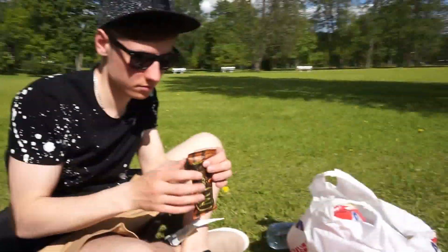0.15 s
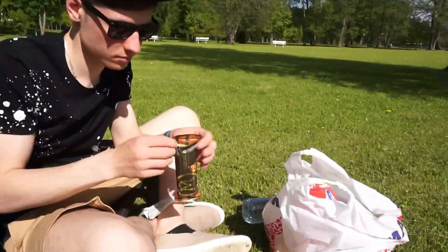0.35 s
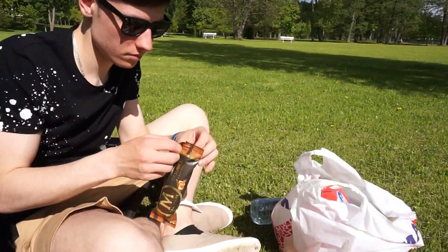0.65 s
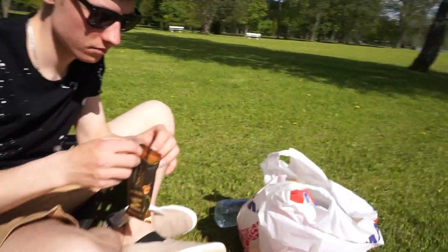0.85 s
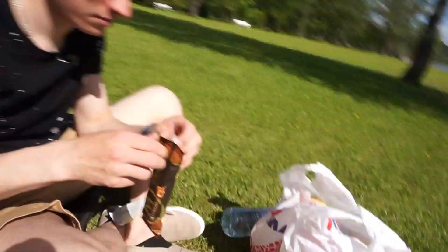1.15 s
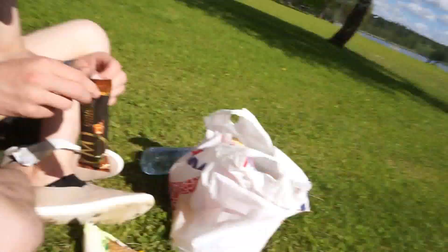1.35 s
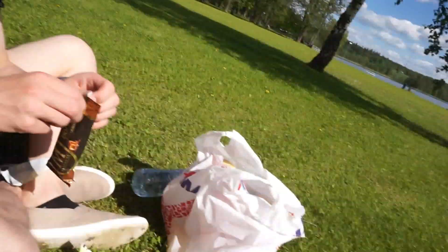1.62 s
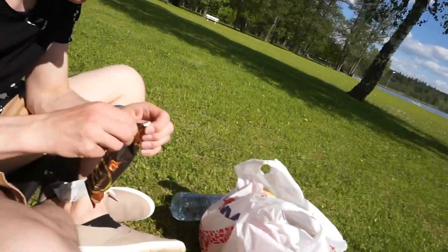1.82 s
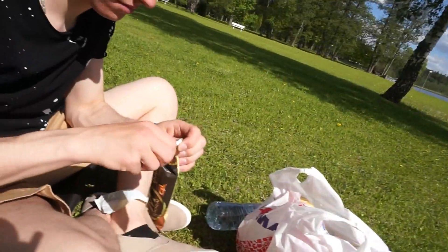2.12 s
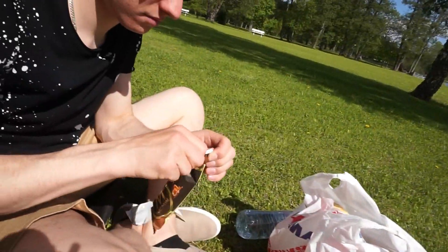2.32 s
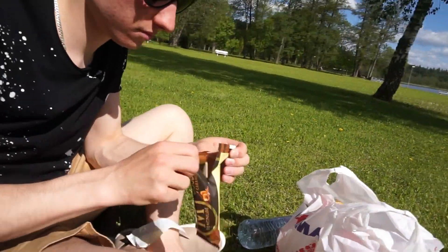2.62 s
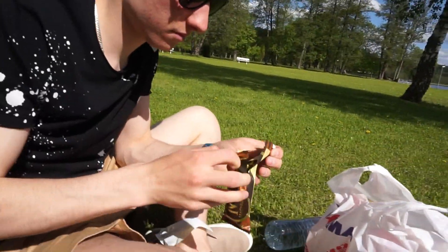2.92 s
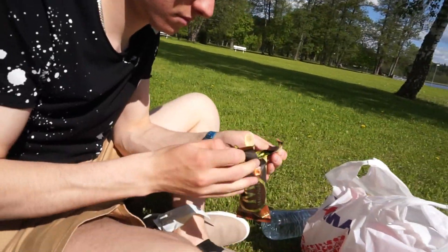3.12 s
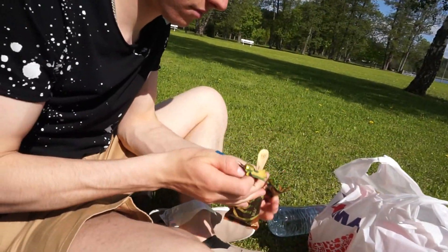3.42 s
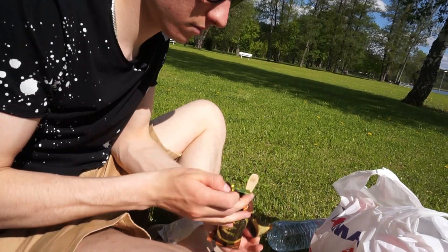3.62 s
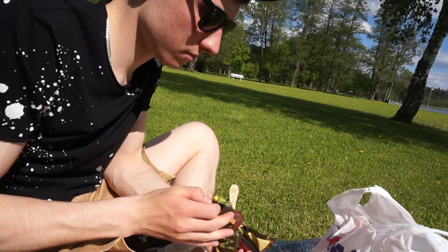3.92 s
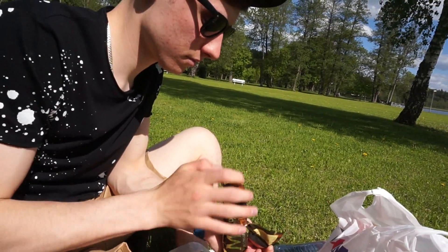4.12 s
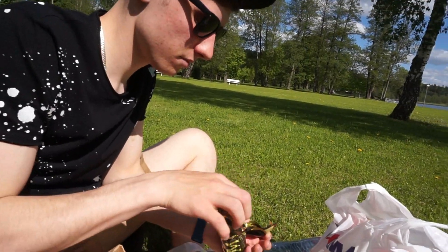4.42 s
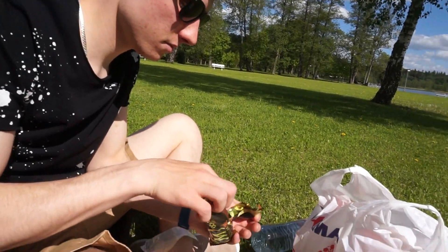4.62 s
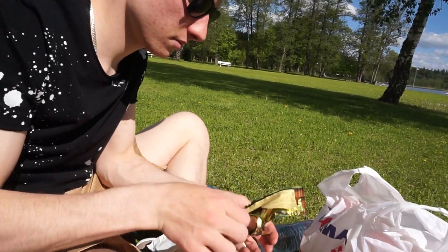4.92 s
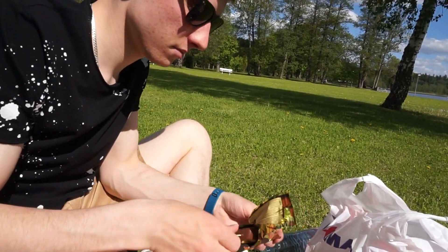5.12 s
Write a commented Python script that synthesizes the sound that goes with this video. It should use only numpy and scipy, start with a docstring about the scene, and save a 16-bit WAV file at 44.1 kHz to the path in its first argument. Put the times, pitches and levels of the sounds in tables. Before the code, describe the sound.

Outdoors on a quiet lawn, a thin, crisp ice cream wrapper is opened by hand close to a stereo microphone, slightly left of centre, dry with no room echo. From 0 to 0.5 s come strong, dense crackles, then looser rustles and snaps. Around 1.05 to 1.1 s a firm cluster of creases lands with a dull, hollow pop of trapped air. Lighter, brighter crinkling follows, with a sharp snap at 1.9 s. At about 2.35 to 2.45 s the seal rips: the loudest, brightest burst, with another short airy thump. Sparse ticks follow. From 3.3 s the seam peels in a tiny fast buzz that slows into separate ringing clicks until 3.65 s, then a crisp rustle to 3.8 s. Afterwards only faint, scattered crackles remain, with small flicks near 4.7 and 5.2 s. A soft, steady hush of trees lies beneath; two very faint, slightly sinking distant tones swell between 4 and 4.7 s.

```python
"""Opening an ice cream wrapper

An ice cream wrapper is opened by hand, close by on a quiet lawn. Buckling creases snap and rustle as short
bursts of resonant noise; the jolted air of the pouch pops as damped tones, and a loud stroke rips the seal.
The seam then peels in a stick-slip zip that slows into jerks, and the loose film is folded back.
Behind it lie a soft steady hush of distant trees and two faint far tones."""
import sys
import numpy as np
from scipy import signal
from scipy.fft import rfft, irfft, next_fast_len
from scipy.io import wavfile
from scipy.ndimage import uniform_filter1d

SR = 44100
rng = np.random.default_rng(int(sys.argv[2]) if len(sys.argv) > 2 else 0)


def persist_wave(psi):
    """Save psi, clipped to +-1, as 16-bit WAV."""
    counts = np.round(np.clip(psi, -1, 1) * 32767).astype(np.int16)
    wavfile.write(sys.argv[1], SR, np.atleast_2d(counts).T)


N = 231782
TIME = np.arange(N) / SR
LEAD_S = .003  # silence ahead of each buckle: room for the zero-phase filters

# light, constant working of the film:
# t/s, body level/dB, level of the lows re body/dB, level of the treble re body/dB
WORKING = [(0.0, -48, -10, -12), (0.4, -54.5, -27, -16), (0.53, -56.5, -6, -13), (0.7, -48.5, -12.5, -6.5),
           (1.12, -49, -2.5, -8), (1.36, -54, -11, -5), (1.77, -49.5, -9.5, 2), (1.95, -56.5, -4, 0),
           (2.25, -53, -8, -11), (2.47, -55, -11, 3), (2.59, -61.5, -3.5, -4.5), (3.1, -62, -17, -3),
           (3.72, -48.5, -14.5, 3), (3.835, -60, -9, -5.5), (4.25, -67, -3.5, -6), (4.75, -58, -1, -6.5),
           (5.08, -62.5, -8.5, -2.5), (5.255, -56, -3, -4.5)]


def amp(db):
    """Decibels to an amplitude ratio."""
    return 10 ** (np.asarray(db) / 20)


def evened(x):
    """Normalises to unit rms over both channels."""
    return x / np.sqrt(np.mean(x ** 2) + 1e-20)


def burst(x):
    """Normalises the energy of a short stereo sound to that of unit rms lasting 10 ms."""
    return x * np.sqrt(2 * SR * .01 / np.sum(x ** 2))


def read(points, hz):
    """Interpolates a spectrum linearly on a log-frequency axis."""
    f, value = np.transpose(points)
    return np.interp(np.log(hz + 1), np.log(f), value)


def follow(curve, s):
    """Interpolates every column of a curve linearly at time s."""
    times, *columns = np.transpose(curve)
    return [np.interp(s, times, column) for column in columns]


def add(mix, s, sound):
    """Superposes a sound on the mix from time s."""
    part = mix[:, max(round(s * SR), 0):][:, :sound.shape[1]]
    part += sound[:, :part.shape[1]]


def freqs(x):
    """Bin frequencies of the spectrum of x, in Hz."""
    return np.fft.rfftfreq(x.shape[-1], 1 / SR)


def shaped(x, gain):
    """Linear filtering: multiplies the spectrum by a response."""
    return irfft(rfft(x) * gain, x.shape[-1])


def resonance(hz, centre_hz, width_hz):
    """Response of a damped oscillator, gain 1 at its centre."""
    return 1j * hz * width_hz / (centre_hz ** 2 - hz ** 2 + 1j * hz * width_hz)


def band(hz, edge, kind, order):
    """Response of a maximally flat (Butterworth) filter."""
    return signal.sosfreqz(signal.butter(order, edge, kind, fs=SR, output="sos"), hz, fs=SR)[1]


def pair(apart, size):
    """Partial coherence: noise at two microphones, a common part and a part of opposite sign."""
    mid, side = rng.standard_normal((2, size))
    return evened(np.array([mid + apart * side, mid - apart * side]))


def snaps():
    """Snap-through buckling: the large creases, one by one."""
    out = np.zeros((2, N))
    # creases that snap: t/s, body level over 10 ms/dB, level of the lows re body/dB,
    # level of the treble re body/dB, ring f/Hz
    large_creases = [(0.0157, -29.5, -13, -6, 2030), (0.035, -34.5, -32, -4, 2680),
                     (0.0471, -32, -22, -5.5, 3390), (0.1092, -38.5, -21, -2.5, 1850),
                     (0.122, -39.5, -19, -6, 3100), (0.1414, -40.5, -8.5, -6, 3440),
                     (0.258, -43, -16, -13, 2700), (0.2732, -30.5, -29, -4, 2990),
                     (0.3033, -39, -17, -11, 1740), (0.3132, -33, -12, -22, 1650),
                     (0.3278, -31, -20.5, -13, 2130), (0.338, -44, -16, 5, 2230),
                     (0.3615, -31, -24, -10, 2800), (0.3813, -44.5, -7.5, -5, 1740),
                     (0.396, -40.5, -11, -12, 1800), (0.4328, -42, -20, -26, 2330),
                     (0.448, -42.5, -13.5, -24, 1940), (0.474, -45.5, -33, -20, 2800),
                     (0.6211, -38, -12.5, -2, 2780), (0.6264, -39.5, -30, -14, 1530),
                     (0.6465, -38, -25, -10, 1860), (0.68, -43.5, -18, -2.5, 2720),
                     (0.6978, -39, -19, -18, 2010), (0.742, -46.5, -14, -10, 2830),
                     (0.753, -43, -17, -4, 3680), (0.7646, -41.5, -16.5, -10, 2300),
                     (0.8434, -45.5, -32, -2, 2600), (0.8976, -40, -17, -9, 3000),
                     (0.9273, -37, -17, -14, 2700), (0.947, -38, -8, -11, 4150),
                     (0.9911, -45, -10, -3, 2690), (1.0215, -43, -16, -8, 2640),
                     (1.0434, -33.5, -8, -16, 1370), (1.074, -31, -8.5, -20, 2660),
                     (1.0842, -27.5, -14.5, -0.5, 3670), (1.1883, -43, -6, -8, 1740),
                     (1.209, -45, -5, -4, 2900), (1.221, -41, -6, -1, 1350), (1.242, -39.5, -6, -0.5, 3900),
                     (1.301, -48.5, -25, -4, 3170), (1.4352, -39.5, -18, -6, 3180),
                     (1.445, -44, -9, 3.5, 3300), (1.49, -47.5, -18, 5, 2940), (1.498, -41.5, -12, 1, 3960),
                     (1.5328, -42.5, -13.5, -4.5, 1430), (1.5717, -47, -10, 5.5, 3080),
                     (1.618, -45.5, -20, 3.5, 1650), (1.7043, -42, -7, 9, 2830),
                     (1.835, -36.5, -15, -0.5, 4600), (1.9233, -29.5, -52, 0, 3920),
                     (2.166, -50, -23, 9.5, 2440), (2.2694, -40, -24, -2.5, 3620),
                     (2.3229, -38, -17.5, -2, 3240), (2.3624, -32.5, -27, -12, 3540),
                     (2.405, -30.5, -3.5, 4, 2500), (2.409, -29.5, -13, 3, 3330),
                     (2.426, -30.5, -8, 2.5, 3800), (2.6667, -42, -15, 2, 4900), (2.795, -48, -13, 4, 2660),
                     (2.8335, -51, -16, 3.5, 2730), (2.848, -49, -37, -2, 2680),
                     (2.955, -47, -27, 1.5, 2520), (3.0078, -42.5, -12, 2.5, 2730),
                     (3.038, -38, -20, -2.5, 2600), (3.0476, -46, -13, 5, 2640),
                     (3.1037, -45, -16, 1, 4560), (3.148, -50.5, -16, 3, 2730), (3.2827, -48, -29, 9, 4440),
                     (3.295, -48, -16, 6, 4140), (3.4362, -38.5, -24, -7, 3280),
                     (3.5006, -40, -25, 6, 4400), (3.6515, -43, -27, 7, 4560),
                     (3.6795, -38, -44, 1.5, 3330), (3.724, -45.5, -15, -5, 2930),
                     (3.7447, -40.5, -42, -4, 2930), (3.76, -41.5, -17.5, -1, 4560),
                     (3.7937, -40, -19, 0.5, 3020), (3.8063, -38.5, -17.5, 1, 1930),
                     (3.901, -46, -43, -6, 3200), (3.92, -49.5, -22, 4, 3020),
                     (3.9408, -45.5, -26, 0.5, 3050), (4.09, -52.5, -30, -1.5, 3040),
                     (4.305, -44, -14, -13, 2130), (4.363, -52, 2.5, -24, 1080),
                     (4.4749, -47, -3.5, 3.5, 3480), (4.669, -46, -14, -5, 2030),
                     (4.68, -45.5, -17, -7, 2060), (4.712, -53, -18, 2.5, 1910),
                     (4.859, -55, 1.5, 5.5, 2880), (4.973, -47.5, -17, 3, 4100),
                     (5.166, -37.5, -18.5, -3, 4750), (5.1665, -40.5, -9.5, -18, 1460),
                     (5.2165, -46.5, -27, -14, 3230), (5.245, -39, -27, -4.5, 4300)]
    for row in large_creases:
        add(out, *crease(*row))
    return out


def crease(s, body_db, weight_db, bright_db, ring_hz, ring=0.4, sharpness=13, overtone=0.3,
           overtone_width_hz=1400):
    """Modal ringing: a facet rings at its own pitch under a bright crack with a stray overtone."""
    slow = buckle(crack=0.27, t60=.015, apart=0.99)
    quick = buckle(crack=0.4, t60=.012, apart=0.72)
    hz = freqs(slow)
    purity = ring * amp(-weight_db / 3)  # a taut facet moves little air and rings more purely
    t = np.maximum(np.arange(slow.shape[1]) / SR - LEAD_S, 0)
    swing = np.exp(-np.pi * ring_hz * t / sharpness) * np.minimum(ring_hz * t / 2, 1)
    cycles = ring_hz * t + rng.random() + 0.066 * rng.standard_normal((2, 1))
    mode = swing * np.sin(2 * np.pi * cycles)

    body, low, _ = registers(slow)
    body = burst(body) + purity * burst(mode)
    overtone_hz = rng.uniform(4300, 12300)
    treble = registers(shaped(quick, 1 + overtone * resonance(hz, overtone_hz, overtone_width_hz)))[2]
    sound = burst(body) + amp(weight_db) * burst(low) + amp(bright_db) * burst(treble)
    return s - LEAD_S, amp(body_db) * sound


def buckle(crack, t60, apart, delay=.0004, size=2048):
    """Scattered bending waves: a facet starts to give, flips with one crack, and the sheet rings down."""
    t = np.maximum(np.arange(size) / SR - LEAD_S, 0)
    onset = np.minimum((t / delay) ** 2, 1)
    shiver = .2 * amp(-60 * t / .027)  # weak motion of the whole sheet, t60 27 ms
    x = pair(apart, size) * (amp(-60 * t / t60) + shiver) * onset
    x /= np.sqrt(np.sum(x ** 2) / 2)
    x[:, round((LEAD_S + delay) * SR)] += crack * rng.choice([-1, 1])
    return x


def registers(x, low_hz=1050, high_hz=4900):
    """Radiation by size: film sound split into body, low and treble (middling, large, tiny facets)."""
    hz = freqs(x)
    # colour of the film: f/Hz, spectral density/dB
    film_colour = [(50, -35), (185, -15.5), (255, -16.5), (400, -6.5), (560, -7), (940, -1), (1150, -1),
                   (1450, 5.5), (2800, 8.5), (3700, 2.5), (5800, 0), (11500, -3), (15500, -7.5)]
    colour = amp(read(film_colour, hz))
    filters = [([low_hz, high_hz], "bandpass"), (low_hz, "lowpass"), (high_hz, "highpass")]
    return [shaped(x, colour * band(hz, edge, kind, order=4)) for edge, kind in filters]


def ticks(count=50, over_db=1, spread_db=3, weight_db=-6, bright_db=3, lowest_hz=1700, highest_hz=3600):
    """Random buckling: small creases give at random, louder where the handling is firmer."""
    out = np.zeros((2, N))
    for k in range(count):
        s = (k + rng.random()) / count * N / SR
        level, weight, bright = follow(WORKING, s)
        level += over_db + spread_db * rng.standard_normal()
        ring_hz = rng.uniform(lowest_hz, highest_hz)
        add(out, *crease(s, level, weight + weight_db, bright + bright_db, ring_hz))
    return out


def rustle(per_s=480, spread_db=4, rub=0.3, clump_db=3, broad=0.23, sharpness=9, count=30):
    """Shot noise and friction: flurries of tiny pitched creases over the hiss of sliding film."""
    grains = np.zeros((2, N))
    for hz in np.geomspace(450, 14000, count):
        struck = rng.random(N) < per_s / count / SR
        sizes = amp(spread_db * np.minimum(rng.exponential(1, N), 3)) * struck
        grain = buckle(crack=0.29, t60=0.016, apart=1.0)
        grain = burst(shaped(grain, broad + resonance(freqs(grain), hz, hz / sharpness)))
        grains += signal.oaconvolve(sizes[None], grain, axes=1)[:, :N]
    flurry = amp(clump_db * evened(uniform_filter1d(rng.standard_normal(N), size=400)))
    gains = effort()
    # by treble level: a light touch only slides, a firm one creases, a hard pull blurs into a rasp
    grip = np.interp(20 * np.log10(gains[2]), [-68, -55, -38], [.15, 1, .35])
    hiss = pair(apart=0.34, size=N)
    drive = (grip * evened(grains * flurry) + rub * hiss) / np.hypot(grip, rub)
    drive = np.pad(drive, [(0, 0), (0, next_fast_len(N) - N)])
    return sum(gain * evened(x[:, :N]) for gain, x in zip(gains, registers(drive)))


def effort(attack_s=0.001, release_s=0.013):
    """Energy addition: gains of body, low and treble for strokes that rise, hold and die away."""
    level, weight, bright = follow(WORKING, TIME)
    gains = amp([level, level + weight, level + bright])
    # pulls and rubs of the fingers, the loudest rips the seal: start t/s, length/s, body level/dB,
    # level of the lows re body/dB, level of the treble re body/dB
    strokes = [(0.0, 0.037, -34.5, -17.5, -9.5), (0.106, 0.18, -49.5, -12, -34),
               (0.343, 0.041, -40.5, -15, -10), (0.392, 0.043, -43, -9, -13),
               (0.608, 0.12, -46, -12.5, -10), (0.817, 0.02, -44, -14, -6.5), (0.924, 0.017, -49, -18, -3),
               (1.076, 0.024, -35, -1.5, -8.5), (1.188, 0.098, -44.5, -6.5, -4),
               (1.69, 0.061, -42, -9.5, 3), (1.826, .012, -41, -14, 2), (2.171, 0.036, -50.5, -14, 1.5),
               (2.362, 0.049, -28.5, -12, -1.5), (2.519, 0.0058, -36.5, -10, -2),
               (2.626, 0.046, -45, -11.5, -1.5), (3.175, 0.04, -60.5, 1.5, 7),
               (3.325, 0.06, -48.5, -17.5, 6), (3.684, 0.013, -40.5, -17, -0.5),
               (3.736, 0.0064, -41, -18, 3.5), (4.334, 0.026, -63, 6, -25), (4.588, 0.096, -54.5, -27, -3),
               (4.723, 0.034, -45.5, -10, -4), (4.795, 0.038, -53, -10, -5),
               (5.028, 0.0093, -64.5, 10.5, 5.5)]
    for start, length, db, weight_db, bright_db in strokes:
        t = TIME - start
        envelope = np.clip(t / attack_s, 0, 1) * np.exp(-np.maximum(t - length, 0) / release_s)
        gains = np.hypot(gains, np.outer(amp([db, db + weight_db, db + bright_db]), envelope))
    return gains


def peel(jitter=0.041, uneven_db=4.0, count=60, fast_t60=.004, slow_t60=0.0077):
    """Stick-slip: a fast buzz of needle-sharp slips slows into separate, ringing jerks."""
    out = np.zeros((2, N))
    # fast zip of the seam: t/s, slip rate/Hz, mean level of a slip over 10 ms/dB
    zip_run = [(3.312, 465, -54), (3.347, 520, -56), (3.391, 240, -45.5), (3.419, 120, -44.5),
               (3.445, 150, -43.5), (3.472, 135, -43.5)]
    # separate jerks after it: t/s, level over 10 ms/dB
    jerks = [(3.476, -36.5), (3.4858, -37), (3.49, -42), (3.514, -38), (3.525, -36.5), (3.535, -45),
             (3.55, -44), (3.561, -39), (3.584, -41), (3.6014, -38), (3.61, -36.5), (3.622, -40),
             (3.634, -39.5)]
    t = np.arange(zip_run[0][0], zip_run[-1][0], 1 / SR)
    slipped = np.cumsum(follow(zip_run, t)[0]) / SR  # the k-th slip falls where this count reaches k
    for k in range(count):
        s = np.interp(k + jitter * rng.standard_normal(), slipped, t)
        db = follow(zip_run, s)[1] + uneven_db * rng.standard_normal()
        add(out, s - LEAD_S, (k < slipped[-1]) * amp(db) * slip(t60=fast_t60))
    for s, db in jerks:
        add(out, s - LEAD_S, amp(db) * slip(t60=slow_t60))
    return out


def slip(t60, wander=0.0096, low_hz=1750, top_hz=12000):
    """Plucked resonator: one jerk of the seam excites the small flap, whose pitch shifts with the pull."""
    x = buckle(crack=0.94, t60=t60, apart=0.55)
    hz = freqs(x)
    pull = 1 + wander * rng.standard_normal()
    # modes of the taut flap beside the seam: mean f/Hz, bandwidth/Hz, amplitude gain
    flap_modes = [(2030, 82, 3.8), (3070, 360, 6), (4270, 330, 6.5), (5140, 300, 3.4), (6300, 240, 2),
                  (12100, 600, 0.66)]
    flap = 1 + sum(gain * resonance(hz, centre * pull, width) for centre, width, gain in flap_modes)
    return burst(shaped(x, flap * band(hz, [low_hz, top_hz], "bandpass", order=2)))


def pouch(rise_s=0.0015, size=6000):
    """Damped cavity oscillation: dull thumps of the jolted air inside the wrapper."""
    out, t = np.zeros((2, N)), np.arange(size) / SR
    # jolts of the air: t/s, level from which the decay starts/dB, f/Hz, t60/s
    pops = [(1.08, -52, 100, 0.063), (1.081, -39.5, 188, 0.079), (1.083, -30.5, 462, 0.049),
            (2.401, -31.5, 394, 0.067)]
    for s, db, hz, t60 in pops:
        envelope = amp(db - 60 * t / t60) * (1 - np.exp(-t / rise_s))
        add(out, s, (envelope * np.cos(2 * np.pi * hz * t))[None])
    return out


def hollowed(x, centre_hz=6000, width_hz=3000):
    """Band rejection: the lower treble is hollow while the pouch is shut and comes in as it opens."""
    # hollow in the lower treble: t/s, fraction removed at the centre by each of two passes
    hollow = [(.8, 0.42), (1.5, 0.01)]
    depth = np.clip(np.interp(TIME, *np.transpose(hollow)), 0, 1)
    for _ in range(2):
        x = x - depth * shaped(x, resonance(freqs(x), centre_hz, width_hz))
    return x


def surroundings(x, t60=0.045, wet_db=-19, size=6000):
    """Diffuse scattering: faint, short returns from legs, bag and ground, without walls."""
    t = np.arange(size) / SR
    tail = rng.standard_normal((2, size)) * amp(-60 * t / t60) * (t > .003)
    tail /= np.linalg.norm(tail[0])
    return x + amp(wet_db) * signal.oaconvolve(x, tail, axes=1)[:, :N]


def ports(x, left_db=1.2, shade_hz=1500, wind_cut_hz=75, bass_width=0.43):
    """Diffraction: long waves reach both ports nearly alike, short ones are shaded from the right."""
    hz = freqs(x)
    short = hz ** 2 / (hz ** 2 + shade_hz ** 2)
    mid = x.mean(0)
    x = mid + shaped(x - mid, bass_width + (1 - bass_width) * short)
    x = shaped(x, amp(left_db * np.array([short, -short])))
    # a wind filter thins the bass
    return signal.sosfilt(signal.butter(2, wind_cut_hz, "highpass", fs=SR, output="sos"), x)


def air(level_db=-70):
    """Stationary filtered noise: the soft, steady hush of distant trees."""
    x = pair(apart=0.66, size=N)
    # open air over the lawn: f/Hz, relative gain/dB
    air_colour = [(25, -7.5), (150, -1.5), (1800, -0.5), (6500, -20.5), (15500, -14.5)]
    return amp(level_db) * evened(shaped(x, amp(read(air_colour, freqs(x)))))


def drones(width_hz=12, sag=.03):
    """Phase diffusion: faint, fuzzy far tones swell and fade while their pitch sinks a little."""
    out = np.zeros((2, N))
    # far tones, heard in the lull: start t/s, length/s, mean f/Hz, peak level/dB
    far_tones = [(3.95, 0.523, 1800, -71), (4.203, 0.49, 912, -70)]
    for s, length, hz, db in far_tones:
        u = np.clip((TIME - s) / length, 0, 1)
        # white frequency noise widens the spectral line to width_hz
        flutter = np.sqrt(width_hz * SR / (2 * np.pi)) * rng.standard_normal(N)
        cycles = np.cumsum(hz * (1 + sag * (.5 - u)) + flutter) / SR
        out += amp(db) * np.sin(np.pi * u) * np.sin(2 * np.pi * cycles)
    return out


def scene():
    """Superposition: the wrapper, a little left of centre, over the background."""
    wrapper = hollowed(snaps() + ticks() + rustle()) + peel() + pouch()
    return ports(surroundings(wrapper)) + air() + drones()


def record(dry, edge_hz=15950):
    """Band limiting: a symmetric low-pass removes the extreme treble without phase distortion."""
    lowpass = signal.firwin(255, edge_hz, window=("kaiser", 9), fs=SR)
    return signal.oaconvolve(dry, lowpass[None], "same")


dry = scene()
out = record(dry)
persist_wave(out)
```